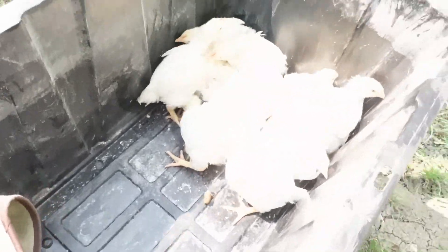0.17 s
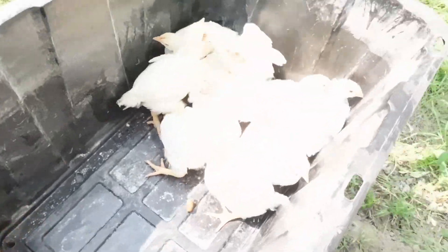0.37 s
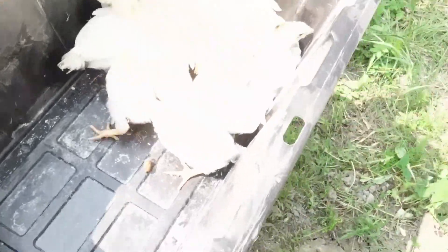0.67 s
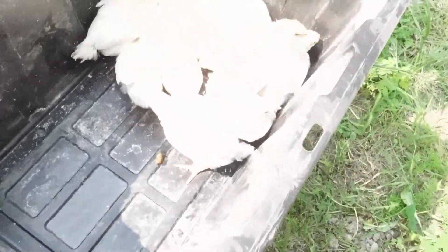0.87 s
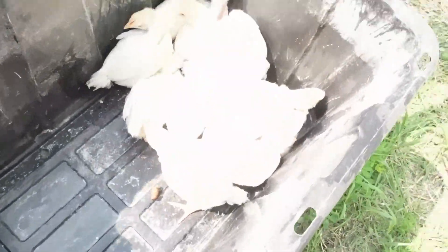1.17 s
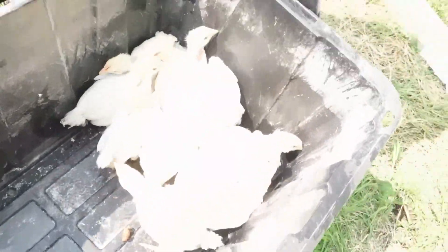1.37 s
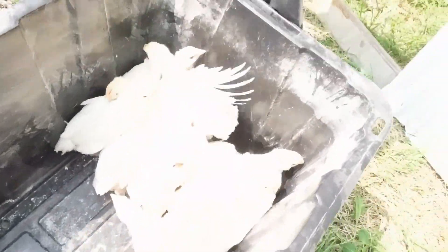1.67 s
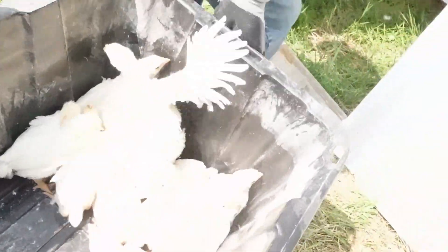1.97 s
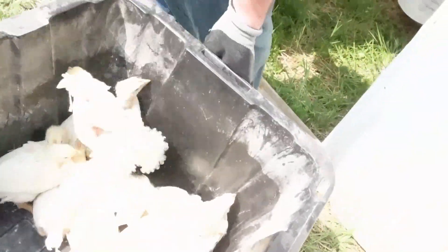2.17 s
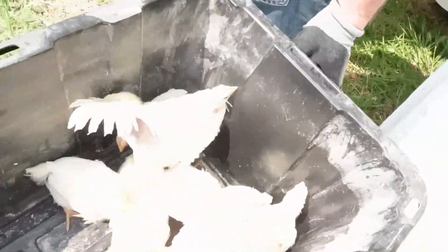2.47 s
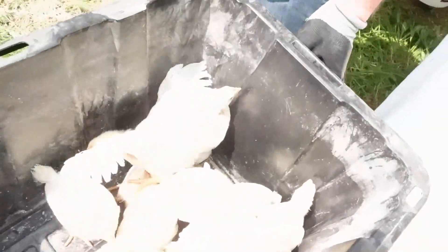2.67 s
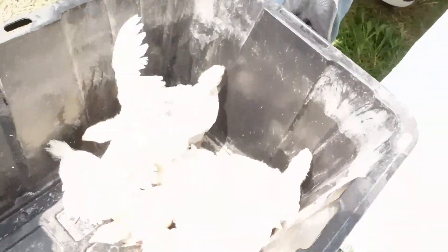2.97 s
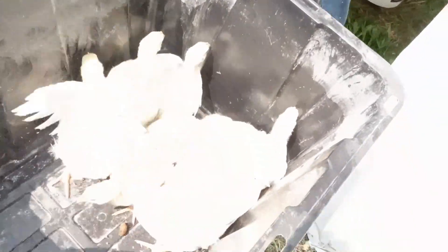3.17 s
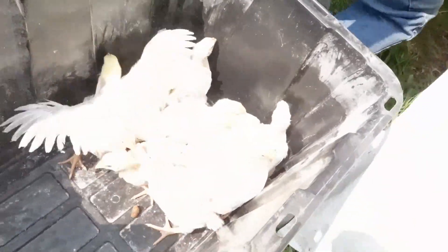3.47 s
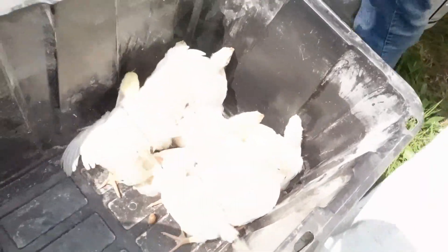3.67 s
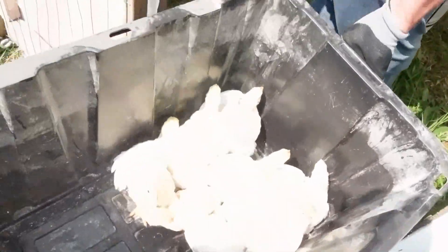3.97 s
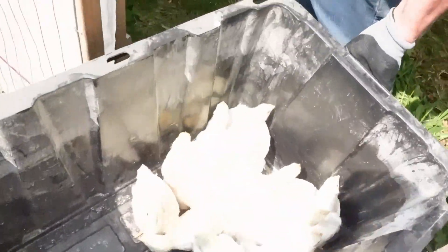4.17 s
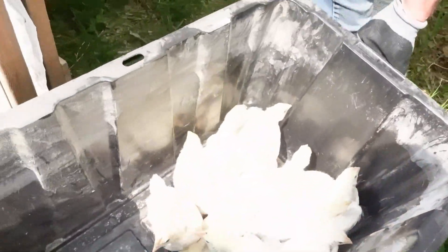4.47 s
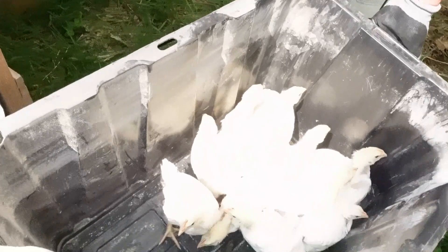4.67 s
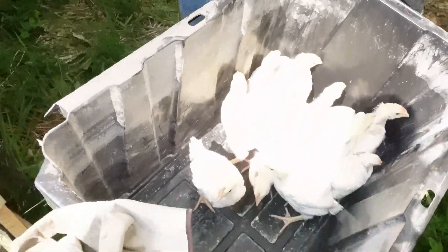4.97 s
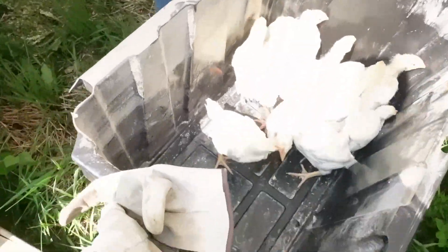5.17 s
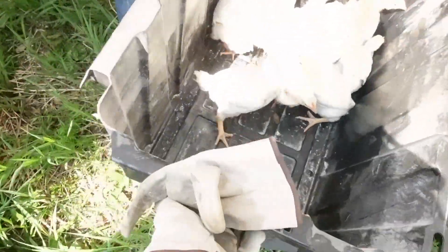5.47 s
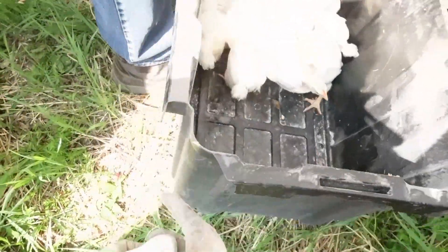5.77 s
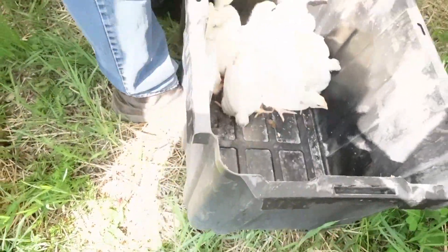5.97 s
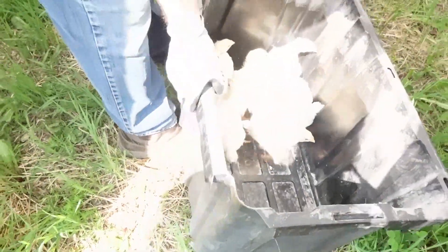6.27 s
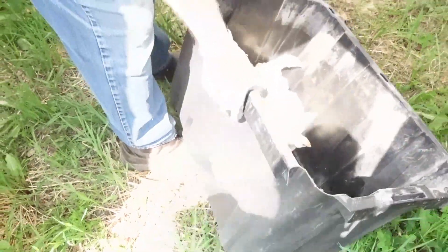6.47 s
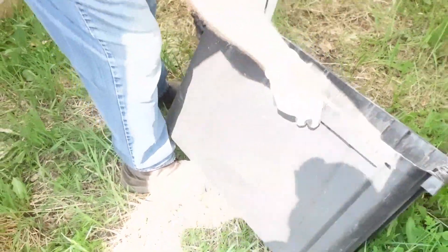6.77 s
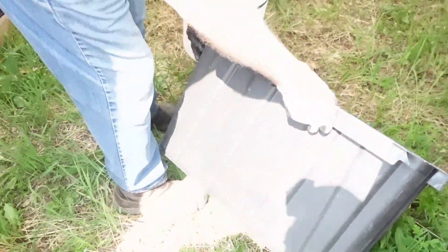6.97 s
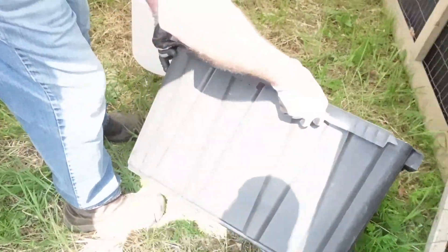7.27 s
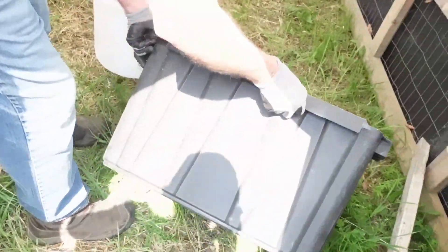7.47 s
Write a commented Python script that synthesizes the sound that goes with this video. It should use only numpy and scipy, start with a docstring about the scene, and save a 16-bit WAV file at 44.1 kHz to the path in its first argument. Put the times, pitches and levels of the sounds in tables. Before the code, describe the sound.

Young chickens peep and cheep constantly while flapping and knocking about in a plastic bin, which is tipped over onto grass.

```python
"""Young chickens in a plastic bin

Outdoors on grass, a close stereo microphone follows the bin as it is carried and tipped out. Peeps,
cheeps and chirps are falling whistles from the syrinx; some birds warble and screech as they flap.
Feet and wings knock on the thin walls, claws tick and skid, and feathers and grass rustle."""
import sys
import numpy as np
from scipy import signal
from scipy.fft import rfft, irfft
from scipy.io import wavfile
from scipy.ndimage import uniform_filter1d, minimum_filter1d

SR = 44100
rng = np.random.default_rng(int(sys.argv[2]) if len(sys.argv) > 2 else 0)


def generate_wav(sig):
    """Save sig (samples, or channels by samples) to the path in sys.argv[1] as 16-bit PCM at SR."""
    pcm = np.round(np.clip(np.atleast_2d(sig).T, -1, 1) * 32767).astype(np.int16)
    wavfile.write(sys.argv[1], SR, pcm)


N = 335601
TIME = np.arange(N) / SR
LEFT_RIGHT = np.array([[1], [-1]])

# Event levels are relative within each table; a call's pitch is the one it falls from.
# flurries of flapping and dragging: (middle [s], half width [s], level [dB])
FLURRIES = [(1.83, 0.1, -39.5), (2.13, 0.1, -41), (3.2, 0.14, -41.5), (5.602, 0.095, -36),
            (6.8, 0.98, -46.5), (7.44, 0.26, -40.5)]
# lulls, the birds standing still: (middle [s], half width [s], level change [dB])
LULLS = [(1.27, 0.098, -9), (6.17, 0.18, -9.5)]
# spectra of feet, feathers, a blow's crack and scraped plastic: (frequency [Hz], level [dB])
SCUFF_SPECTRUM = [(40, 2), (100, -14), (200, 3), (330, 0), (520, 4), (1200, 1), (2500, -12), (5000, -39)]
RUSTLE_SPECTRUM = [(100, -14.5), (2000, 2.5), (6000, -4), (10000, -11.5), (15500, -24)]
CRACK_SPECTRUM = [(150, -13), (1700, 8.5), (3500, 1.5), (7000, -9.5), (15000, -22)]
SCRAPE_SPECTRUM = [(70, -37), (330, -7), (1200, -5.5), (2400, -0.5), (4500, -18.5), (7000, -26.5),
                   (15000, -45)]
# sharp peeps: (start of fall [s], nominal fall length [s], pitch [Hz], level [dB])
PEEPS = [(0.046, 0.048, 3600, -30.5), (0.217, 0.043, 3380, -30.5), (0.415, 0.045, 3510, -26.5),
         (0.456, 0.04, 2920, -32.5), (0.552, 0.058, 3440, -25), (0.695, 0.022, 3050, -26),
         (0.82, 0.035, 3600, -37.5), (0.894, 0.053, 3705, -24.5), (0.951, 0.037, 3670, -38.5),
         (1.345, 0.041, 3010, -30.5), (1.396, 0.039, 3520, -26.5), (1.51, 0.042, 2856, -26),
         (1.615, 0.046, 3670, -35.5), (2.017, 0.026, 3510, -28), (2.591, 0.022, 3365, -26.5),
         (2.901, 0.035, 3440, -25), (3.225, 0.032, 3606, -23), (3.545, 0.037, 3375, -20.5),
         (3.908, 0.025, 3530, -28), (4.069, 0.038, 3424, -24), (4.618, 0.05, 3500, -23.5),
         (4.793, 0.053, 3410, -22.5), (5.37, 0.056, 3510, -29), (5.655, 0.042, 3600, -33.5),
         (6.002, 0.057, 3420, -28.5), (6.062, 0.041, 3300, -32.5), (6.099, 0.058, 3220, -35.5),
         (6.434, 0.062, 3390, -34), (6.502, 0.059, 3520, -24), (6.66, 0.036, 3300, -33),
         (6.88, 0.048, 3280, -29), (6.966, 0.042, 3070, -33.5), (7.01, 0.038, 3235, -26.5),
         (7.19, 0.057, 2670, -35)]
# slow cheeps: (start of fall [s], fall length [s], pitch [Hz], level [dB], voice split [0-1])
CHEEPS = [(0.083, 0.054, 2800, -33, 0), (0.351, 0.08, 3214, -27, 0), (1.131, 0.08, 3176, -29, 0.2),
          (1.463, 0.065, 3070, -29.5, 0.1), (1.715, 0.074, 3074, -26.5, 0.37),
          (4.489, 0.072, 2925, -30.5, 0.9), (5.194, 0.085, 3010, -26.5, 0.67),
          (5.16, 0.075, 2626, -30.5, 0.8), (5.453, 0.08, 3060, -23, 0.1), (5.77, 0.069, 3064, -30, 0.4),
          (6.015, 0.081, 3190, -29.5, 0.3), (6.267, 0.12, 3327, -32, 0.4), (6.768, 0.068, 3166, -32, 0.74),
          (7.075, 0.078, 2990, -31, 0.5), (7.312, 0.067, 3097, -32.5, 0.76)]
# hooked chirps: (start of fall [s], nominal fall length [s], pitch [Hz], level [dB])
CHIRPS = [(1.131, 0.041, 2744, -25.5), (1.284, 0.04, 3110, -28.5), (1.3, 0.037, 2600, -26),
          (1.303, 0.042, 3262, -30), (1.449, 0.041, 3200, -27.5), (4.692, 0.055, 3564, -28.5),
          (4.948, 0.06, 3740, -35.5), (5.025, 0.068, 3325, -31.5), (5.865, 0.057, 3634, -26),
          (5.95, 0.075, 3190, -29.5), (6.193, 0.062, 3760, -36.5)]
# the tune of each kind of call: (time from start of fall [fall lengths], pitch [ratio])
PEEP_TUNE = [(-.8, .82), (-.55, 1.06), (-.15, 1.04), (0, 1), (.5, .745), (1.28, 0.45)]
CHEEP_TUNE = [(-.55, .74), (-.35, 0.97), (0, 1), (.27, .83), (.82, .735), (1, 0.569)]
CHIRP_TUNE = [(-.2, 1), (0, 1), (.4, .7), (.7, .6), (1, 0.58)]
# wall echoes on these calls, growing as the bin is lowered: (time [s], strength [ratio])
ECHO_STRENGTH = [(4.8, 0.42), (5.9, 0.76)]
# modes of the bin, a row each for floor, walls and rim: (nominal frequencies [Hz])
BIN_MODES = [
    [180.7, 219, 267, 342],
    [472, 538, 579, 690, 885],
    [885, 1120, 1245, 1536],
]
# blows on the bin, soft for a boom, hard for a clack: (time [s], level [dB], hardness [dB])
KNOCKS = [(0.245, -37.5, -6), (0.308, -36, -3.5), (0.665, -34.5, 3), (0.684, -31, -9), (1.105, -41, 12),
          (1.492, -40, -8), (1.603, -32.5, -3), (1.675, -35, 5), (1.861, -33.5, 7.5), (1.907, -29.5, -0.5),
          (2.016, -35.5, -1), (2.415, -36, 3), (2.443, -31.5, -3), (2.507, -39, -2), (2.528, -30.5, -5),
          (2.653, -34.5, -3.5), (2.78, -33.5, -5.5), (2.992, -36.5, -2.5), (3.025, -36, 1),
          (3.056, -34, -8), (3.151, -33, 1.5), (3.686, -38, -1.5), (3.873, -34, 4.5), (5.027, -34.5, -14.5),
          (5.291, -33.5, 3.5), (5.538, -35, 1), (5.557, -36.5, 2), (5.618, -31.5, 4), (5.797, -32, 3),
          (5.915, -36, 4), (6.398, -37, 4), (6.711, -34.5, 1.5), (6.751, -37.5, 2), (6.883, -37.5, 5.5),
          (7.122, -36.5, 7), (7.191, -36.5, -10), (7.399, -34.5, -2.5), (7.441, -33, -7),
          (7.538, -31.5, 0.5)]
# plastic scraping: (time [s], length [s], level [dB])
SCRAPES = [(0.358, 0.0966, -30), (0.489, 0.125, -29)]
# feathers, cloth and grass brushing: (time [s], length [s], level [dB], band centre [Hz])
SWISHES = [(1.007, 0.1, -40.5, 6400), (2.973, 0.08, -40.5, 6840), (3.749, 0.87, -48, 1270),
           (4.0, 0.9, -50.5, 8000), (4.55, 0.28, -39.5, 7140), (5.479, 0.61, -44.5, 4860)]
# claws and quills on the plastic: (time [s], level [dB])
TICKS = [(1.673, -26.5), (1.721, -23.5), (1.762, -19.5), (1.783, -30), (1.83, -20), (1.936, -19),
         (2.01, -18), (2.071, -22), (2.15, -16), (2.221, -19), (3.17, -17.5), (3.203, -18), (3.367, -22),
         (6.4244, -19.5), (6.7296, -20), (7.12, -21), (7.247, -22.5)]
# wavering cries: (level [dB], overtone rise under strain [dB], course of (time [s], pitch [Hz]))
WARBLES = [(-24, -4, [(1.778, 3160), (1.79, 2670), (1.805, 3510), (1.82, 2770), (1.836, 3590)]),
           (-25, 0, [(1.908, 2060), (1.927, 3330), (1.945, 2610), (1.96, 3030), (1.975, 2850)]),
           (-22.5, 18, [(2.076, 1950), (2.092, 3140), (2.11, 3350), (2.118, 2520), (2.128, 3070),
           (2.146, 3100)]), (-25, 16.5, [(2.241, 2030), (2.262, 3300), (2.28, 2900), (2.291, 3170),
           (2.303, 2790), (2.323, 1780)]), (-29, 0, [(2.436, 2120), (2.458, 3340), (2.479, 2060)]),
           (-34, -2, [(4.985, 3070), (5.003, 3430), (5.03, 3130)])]
# hoarse openings of calls: (time [s], length [s], level [dB])
SCREECHES = [(3.165, 0.041, -28), (3.478, 0.063, -31.5), (3.843, 0.061, -35)]
# birds sliding down the tipped bin: (time [s], length [s], level [dB], wall resonance [Hz])
SKIDS = [(6.72, 0.16, -36, 750), (7.355, 0.065, -32.5, 606), (7.52, 0.067, -33, 680)]


def amp(db):
    """Decibels to amplitude."""
    return 10 ** (np.asarray(db) / 20)


def unit_rms(x):
    """Scales a signal to rms 1."""
    return x / np.sqrt(np.mean(x ** 2) + 1e-20)


def add(mix, start, sound):
    """Lays a sound into the mix at a time in seconds."""
    part = mix[..., max(round(start * SR), 0):][..., :sound.shape[-1]]
    part += sound[..., :part.shape[-1]]


def low_cut(x, hz, order):
    """Rolls off the bass."""
    return signal.sosfilt(signal.butter(order, hz, "high", fs=SR, output="sos"), x)


def colour(x, spectrum):
    """Filters by a spectrum drawn on a log-frequency axis; rms 1."""
    hz, db = np.transpose(spectrum)
    f = np.fft.rfftfreq(x.shape[-1], 1 / SR)
    gain = amp(np.interp(np.log(f + 1), np.log(hz), db))
    return unit_rms(irfft(rfft(x) * gain, x.shape[-1]))


def wander(n, hz):
    """Smooth random motion up to about the given rate; rms near 1."""
    noise = rng.standard_normal(n + SR // 10)
    f = np.fft.rfftfreq(len(noise), 1 / SR)
    return unit_rms(irfft(rfft(noise) * np.exp(-(f / hz) ** 2)))[:n]


def grains(n, per_s, spread_db=0):
    """Sparse clicks of uneven size; rms 1."""
    size = amp(spread_db * np.minimum(rng.exponential(size=n), 4))
    return unit_rms(size * rng.standard_normal(n) * (rng.random(n) < per_s / SR))


def stereo_noise(draw, spectrum, side):
    """Two coloured draws of noise: one in the middle, one as the side signal."""
    return colour(draw(), spectrum) + side * colour(draw(), spectrum) * LEFT_RIGHT


def commotion_db(rest_db=-54):
    """Level of the scuffing: a quiet shuffle that swells in flurries and sinks in lulls."""
    flurries = sum(amp(db) ** 2 * np.exp(-((TIME - mid) / width) ** 2) for mid, width, db in FLURRIES)
    lulls_db = sum(db * np.exp(-((TIME - mid) / width) ** 2) for mid, width, db in LULLS)
    return 10 * np.log10(amp(rest_db) ** 2 + flurries) + lulls_db


def bustle(rustle_db=-19, rustle_follows=0.49):
    """Shuffling feet excite the bin in clumps; feathers and grass crackle above, swelling less."""
    effort_db = commotion_db()
    clumps = wander(N, 28.4)
    feet = stereo_noise(lambda: grains(N, per_s=2500, spread_db=2) + 0.31 * rng.standard_normal(N),
                        SCUFF_SPECTRUM, side=0.058)
    feathers = stereo_noise(lambda: grains(N, per_s=1300) + rng.standard_normal(N),
                            RUSTLE_SPECTRUM, side=0.42)
    feathers_db = rustle_db + rustle_follows * effort_db + 1.96 * clumps
    return feet * amp(effort_db + 3.5 * clumps) + feathers * amp(feathers_db)


def syrinx(hz, overtone_db, jitter=0.017, waver=0.0114, beak_hz=5800, beak_lift=0.73):
    """A nearly pure, unsteady whistle; a resonance of the open beak lifts its overtone."""
    n = len(hz)
    phase = 2 * np.pi * np.cumsum(hz * (1 + jitter * wander(n, 530) + waver * wander(n, 48.2))) / SR
    overtone = amp(overtone_db) * (1 + beak_lift / (1 + ((2 * hz - beak_hz) / 350) ** 2))
    harmonics = np.sin(2 * phase) + 0.11 * np.sin(3 * phase)
    return (np.sin(phase) + overtone * harmonics) / np.hypot(1, overtone)


def wall_echoes(x, strength, side=0.31):
    """Six echoes off the bin's walls notch the sound, differently left and right."""
    heard = np.array([np.pad(x, (0, SR // 40))] * 2)
    for delay in rng.uniform(.0006, 0.011, 6):
        reflection = rng.normal() + side * rng.normal() * LEFT_RIGHT
        add(heard, delay, strength * np.exp(-delay / 0.0052) * reflection * x)
    return heard * np.linalg.norm(x) / np.linalg.norm(heard.mean(0))


def call(start, length, pitch_hz, db, tune, reach, lead_db, rasp, lock_hz, throat_hz, throat_width_hz,
         split=0.12, twin_db=-8, jump_db=7.5, overtone_db=-24, rattle=0.68, flutter_db=3):
    """A hoarse lead-in, then a falling whistle: two-voiced, then purer and louder, then breaking up."""
    tune_times, tune_ratios = np.transpose(tune)
    lead = -tune_times[0] * length
    t = np.arange(-lead, reach * length + 0.003, 1 / SR)
    n = len(t)
    opening = np.sqrt(np.maximum(-t / lead, 0))
    breaking = np.clip(t / (reach * length), 0, 1) ** 8
    glide = uniform_filter1d(np.interp(t / length, tune_times, tune_ratios), size=250, mode="nearest")
    hz = pitch_hz * glide * (1 + .016 * wander(n, 110))
    fade = np.clip(np.minimum(t - t[0], t[-1] - t) / 0.0054, 0, 1)
    effort = amp(lead_db * opening + flutter_db * wander(n, 110)) * fade
    # the two sides of the syrinx lock together once the pitch has dropped, unless the voice stays split
    locked = np.clip((lock_hz - hz) / 120, 0, 1) * np.clip(t / 0.0019, 0, 1)
    purity = locked * (1 - split)
    twin = syrinx(hz * rng.uniform(1.09, 1.17), overtone_db=-15.5)
    twin *= amp(twin_db) * (1 - locked + 2 * split * locked)
    voice = syrinx(hz, overtone_db + 7 * breaking, jitter=0.012) * amp(jump_db * purity)
    voice *= 1 + rattle * breaking * wander(n, 400)
    breath = (.27 - .19 * purity) * wander(n, 900)
    husk = 1 + breath + rasp * opening * wander(n, 2100)
    voice = (voice + twin) * effort * husk / np.hypot(1, (hz - throat_hz) / throat_width_hz)
    voice *= amp(db) / np.std(voice[t > 0])
    return start - lead, wall_echoes(voice, strength=np.interp(start, *np.transpose(ECHO_STRENGTH)))


def peep(start, length, pitch_hz, db, unhurried_db=-29):
    """A raspy opening and a steep fall; an urgent peep opens longer and harsher and falls further."""
    urgency_db = db - unhurried_db
    lead_stretch = np.exp(.06 * urgency_db)
    tune = [(when * lead_stretch if when < 0 else when, ratio) for when, ratio in PEEP_TUNE]
    return call(start, length, pitch_hz, db, tune, reach=1 + .015 * urgency_db, lead_db=-12.5,
                rasp=0.83 * amp(0.7 * urgency_db), lock_hz=2837, throat_hz=2680, throat_width_hz=880)


def cheep(start, length, pitch_hz, db, split, trim_db=-0.5):
    """A plaintive whistle that arches up, sinks to a shelf and drops off at the end."""
    return call(start, length, pitch_hz, db + trim_db, CHEEP_TUNE, reach=1, lead_db=-5.5,
                rasp=0.11, lock_hz=2870, throat_hz=2250, throat_width_hz=440, split=split)


def clatter(above_db=-1, spread_db=3, hardness_db=6, count=70):
    """Rows of knocks for the lighter steps and bumps, as strong as the commotion of the moment."""
    place, size, hardness = rng.uniform(-1, 1, (count, 3)).T
    starts = (np.arange(count) + (place + 1) / 2) / count * TIME[-1]
    levels_db = np.interp(starts, TIME, commotion_db()) + above_db + spread_db * size
    return list(zip(starts, levels_db, hardness_db + 4 * hardness))


def knock(start, db, hardness_db, t60_at_200_hz=0.043, damping=0.79, crack_db=-2.5, trim_db=35.5):
    """A foot lands and scuffs; the thin plastic rings briefly, its high modes dying first."""
    t = np.arange(SR // 6) / SR
    contact = grains(len(t), per_s=1500) * np.exp(-t / 0.0075) * 0.1
    contact[0] += 1
    shares = amp([-8 - hardness_db, 0, -3.5 + hardness_db])  # floor, walls, rim
    shares /= np.linalg.norm(shares)
    body = 0
    for modes, share in zip(BIN_MODES, shares):
        ring = sum(rng.normal() * np.sin(2 * np.pi * hz * rng.uniform(0.96, 1.101) * t)
                   * amp(-60 * t / (t60_at_200_hz * (200 / hz) ** damping)) for hz in modes)
        attack = 1 - np.exp(-2 * modes[0] * t)
        ring = signal.fftconvolve(ring * attack, contact)[:len(t)]
        body = body + share * ring / np.linalg.norm(ring)
    crack = stereo_noise(lambda: rng.standard_normal(len(t)), CRACK_SPECTRUM, side=0.12)
    crack *= np.exp(-t / 0.0077)
    crack *= shares[2] * amp(crack_db) / np.linalg.norm(crack[0])
    body = wall_echoes(body, strength=0.079, side=1)[:, :len(t)]
    return start, amp(db + trim_db) * (body + crack)


def scrape(start, length, db, groan_hz=345, groan_db=-9.5, groan_waver=0.062, hollow_db=-6):
    """Plastic sticks and slips in a dense rasp, and one wall groans and rings hollowly along."""
    n = int(length * SR)
    rasp = stereo_noise(lambda: grains(n, per_s=4000, spread_db=0.5), SCRAPE_SPECTRUM, side=0.58)
    cycles = np.cumsum(groan_hz * (1 + groan_waver * wander(n, 46))) / SR
    groan = amp(groan_db) * np.sin(2 * np.pi * cycles) * (1 + 0.95 * wander(n, 64))
    _, hollow = skid(start, length, hollow_db, 2 * groan_hz)
    return start, amp(db) * (rasp + groan + hollow) * signal.windows.tukey(n, .15)


def swish(start, length, db, centre_hz):
    """Feathers, cloth or grass rub in a soft swell; the brighter, the wider its band."""
    n = int(length * SR)
    spread = 1 + np.sqrt(centre_hz / 3500)
    band = [(centre_hz * spread ** step, band_db)
            for step, band_db in [(-4, -60), (-1, -6), (0, 0), (1, -15), (2, -34)]]
    swell = amp(db) * signal.windows.tukey(n, .8) * amp(wander(n, 25))
    return start, swell * stereo_noise(lambda: rng.standard_normal(n), band, side=0.35)


def chirp(start, length, pitch_hz, db):
    """A whistle that starts at the top, plunges and levels out in a low hook."""
    return call(start, length, pitch_hz, db, CHIRP_TUNE, reach=0.91, lead_db=-4.5,
                rasp=0.17, lock_hz=2730, throat_hz=2590, throat_width_hz=650)


def tick(start, db, trim_db=-5, decay_s=0.0056):
    """A claw or wing quill flicks the plastic, dry and bright."""
    t = np.arange(SR // 20) / SR
    flick = stereo_noise(lambda: rng.standard_normal(len(t)), RUSTLE_SPECTRUM, side=0.12)
    return start, amp(db + trim_db) * np.exp(-t / decay_s) * flick


def warble(db, strain_db, course, flutter_db=4, overtone_db=-28, rasp=0.21):
    """A cry that swings in pitch and cracks into half-pitch lines late on; strain turns it shrill."""
    times, pitches = np.transpose(course)
    t = np.arange(times[0], times[-1], 1 / SR)
    n = len(t)
    hz = uniform_filter1d(np.interp(t, times, pitches), size=300, mode="nearest")
    late = np.sin(np.pi * (np.arange(n) / n) ** 2) ** 2
    undertone = 0.18 * late * syrinx(hz / 2, overtone_db)
    voice = syrinx(hz, overtone_db + strain_db * late, beak_lift=3.4)
    voice = voice * (1 + undertone + rasp * wander(n, 900)) + undertone
    voice *= amp(flutter_db * wander(n, 150)) * signal.windows.tukey(n, .1)
    return times[0], wall_echoes(amp(db) * unit_rms(voice), strength=0.38)


def screech(start, length, db, pitch_hz=3620, roughness=0.98):
    """The syrinx shakes chaotically and throws sidebands around its top note."""
    n = int(length * SR)
    voice = syrinx(np.full(n, pitch_hz), overtone_db=-23) * (1 + roughness * wander(n, 2300))
    return start, wall_echoes(amp(db) * unit_rms(voice * signal.windows.tukey(n, .4)), strength=0.54)


def resonate(x, hz, width_hz):
    """A resonance that follows the curve hz; rms 1."""
    carrier = np.exp(2j * np.pi * np.cumsum(hz) / SR)
    pole = np.exp(-np.pi * width_hz / SR)
    return unit_rms((carrier * signal.lfilter([1], np.poly([pole, pole]), x / carrier)).real)


def skid(start, length, db, wall_hz, width_hz=330, flex=0.18, upper_db=-7):
    """Claws slip in jerks down a hollow wall, whose two main resonances shift as it flexes."""
    n = int(length * SR)
    slips = grains(n, per_s=1500) * amp(6 * wander(n, 50))
    hz = wall_hz * (1 + flex * wander(n, 27))
    hollow = resonate(slips, hz, width_hz) + amp(upper_db) * resonate(slips, 2 * hz, 2 * width_hz)
    return start, amp(db) * hollow * signal.windows.tukey(n, .2)


def yard(x, wet_db=-21, t60=0.34):
    """A faint, short scatter comes back from the fence and the ground."""
    t = np.arange(SR // 3) / SR
    tail = rng.standard_normal((2, len(t))) * amp(-60 * t / t60) * (t > .006)
    tail += tail.mean(0)
    return x + amp(wet_db) * signal.fftconvolve(x, tail / np.linalg.norm(tail[0]), axes=1)[:, :N]


def scene():
    """The bin at close range; the birds drift to the right as it is lowered and tipped."""
    birds, plastic = np.zeros((2, 2, N))
    for mix, source, table in (
            (birds, peep, PEEPS), (birds, chirp, CHIRPS), (birds, cheep, CHEEPS),
            (birds, warble, WARBLES), (birds, screech, SCREECHES),
            (plastic, knock, KNOCKS), (plastic, knock, clatter()), (plastic, tick, TICKS),
            (plastic, scrape, SCRAPES), (plastic, skid, SKIDS), (plastic, swish, SWISHES)):
        for row in table:
            add(mix, *source(*row))
    birds = low_cut(birds, hz=1200, order=4)  # small throats carry no bass
    pan_db = np.interp(TIME, [3.5, 5.2], [-.2, -2.8])
    return yard(birds * amp(LEFT_RIGHT * pan_db / 2) + plastic) + bustle()


def limit(x, ceiling_db):
    """A fast limiter rounds off the loudest peaks."""
    peak = -minimum_filter1d(-abs(x).max(0), size=100)
    gain = (1 + (peak / amp(ceiling_db)) ** 6) ** (-1 / 6)
    return x * uniform_filter1d(gain, size=100)


def record(dry, top_hz=15850):
    """Two closely spaced microphone ports share the bass; then low cut, limiter and band limit."""
    side = low_cut((dry[0] - dry[1]) / 2, hz=450, order=1)
    ports = low_cut(dry.mean(0) + side * LEFT_RIGHT, hz=125, order=3)
    band_limit = signal.firwin(511, top_hz, window=("kaiser", 9), fs=SR)
    return signal.oaconvolve(limit(ports, ceiling_db=-12.5), band_limit[None], "same")


dry = scene()
out = record(dry)
generate_wav(out)
```